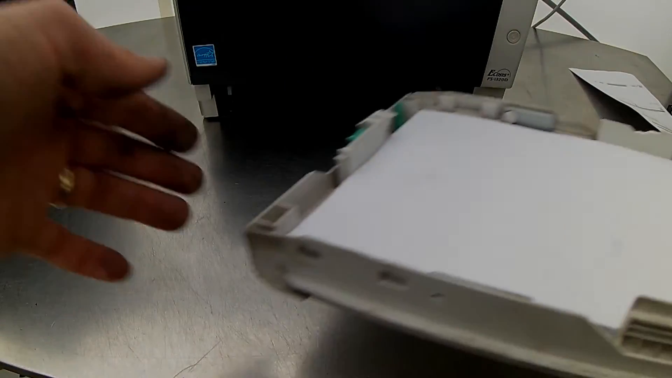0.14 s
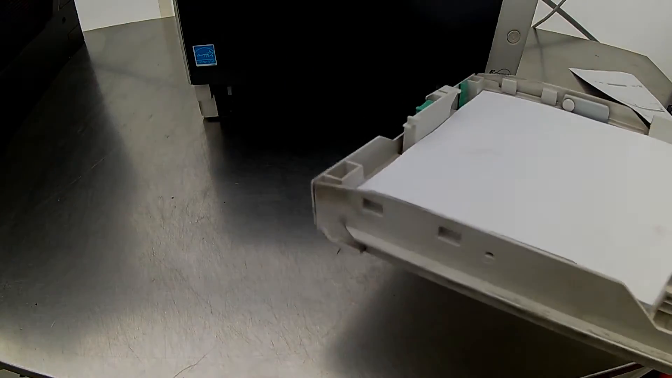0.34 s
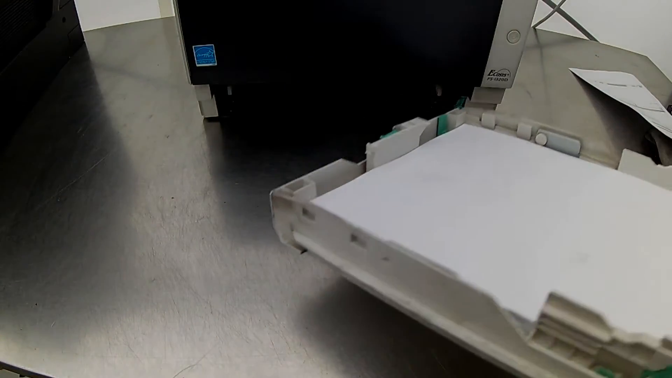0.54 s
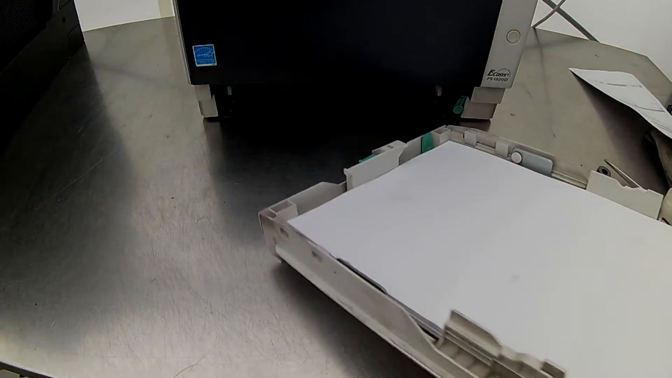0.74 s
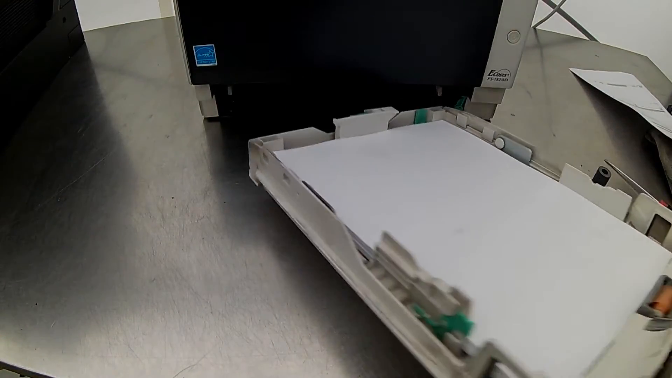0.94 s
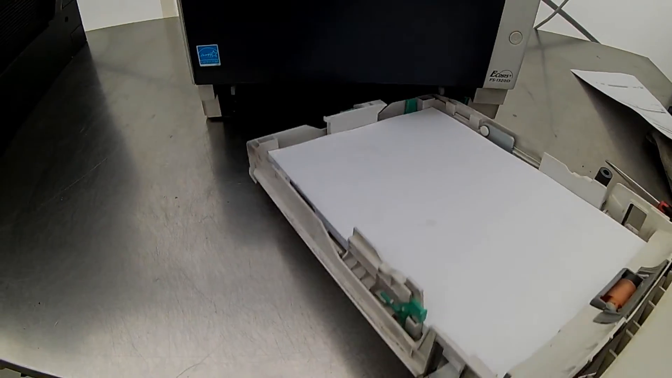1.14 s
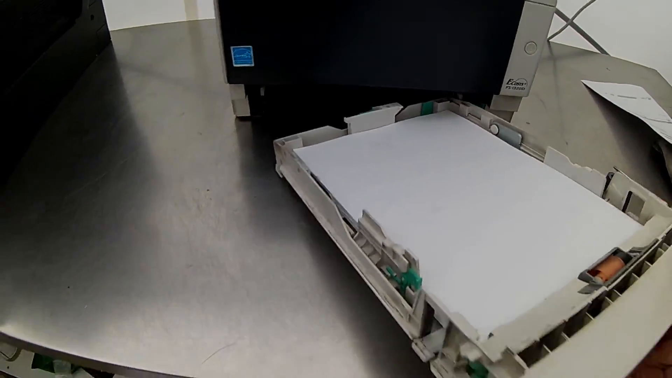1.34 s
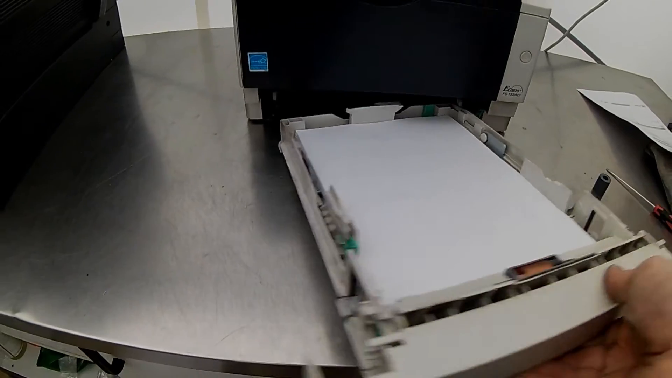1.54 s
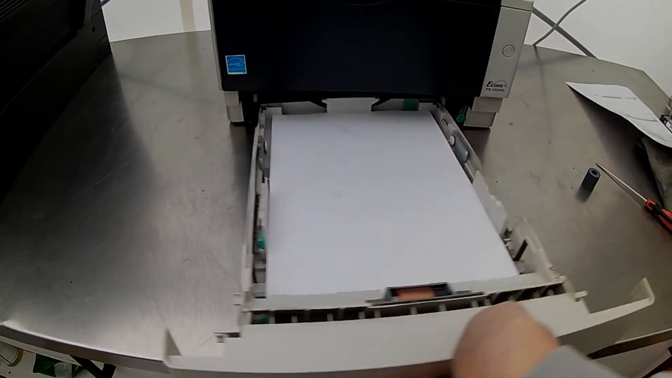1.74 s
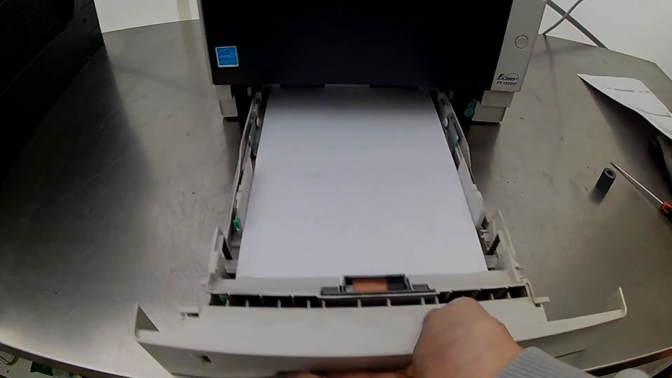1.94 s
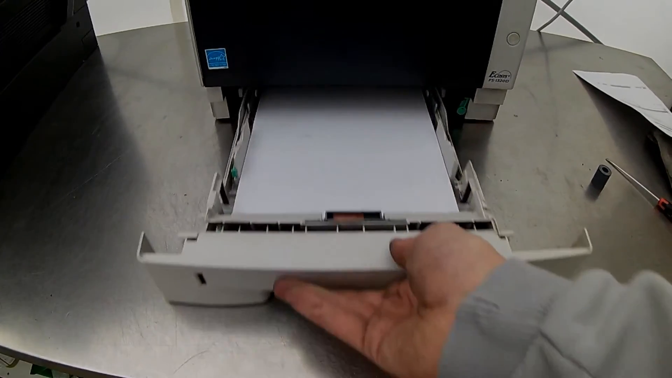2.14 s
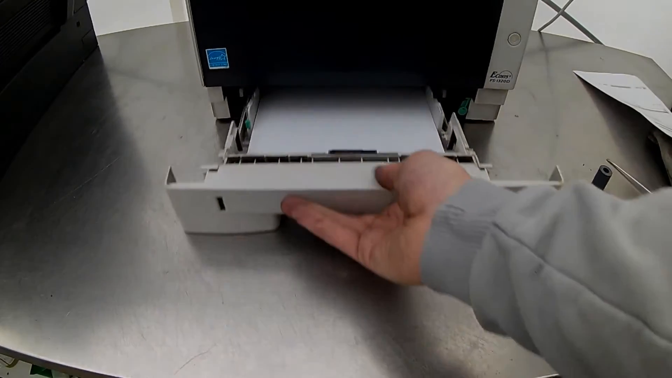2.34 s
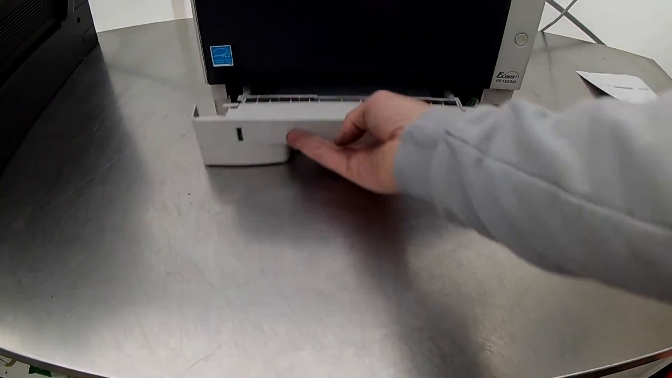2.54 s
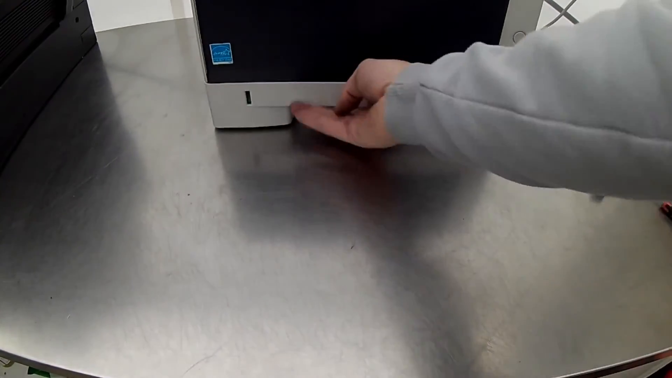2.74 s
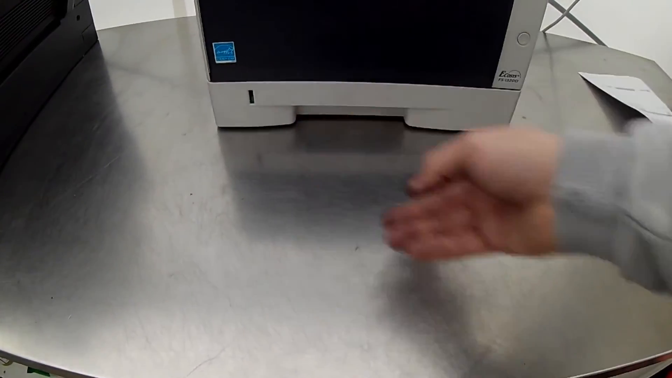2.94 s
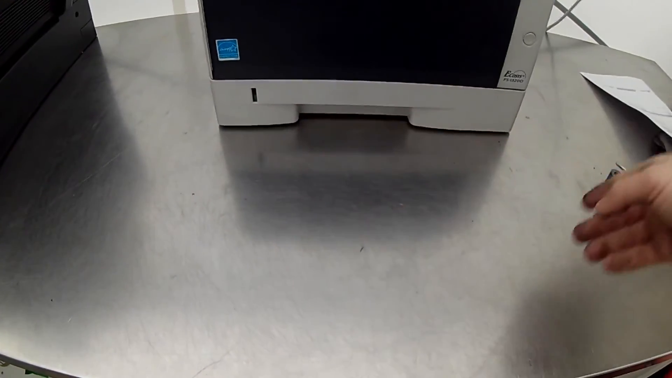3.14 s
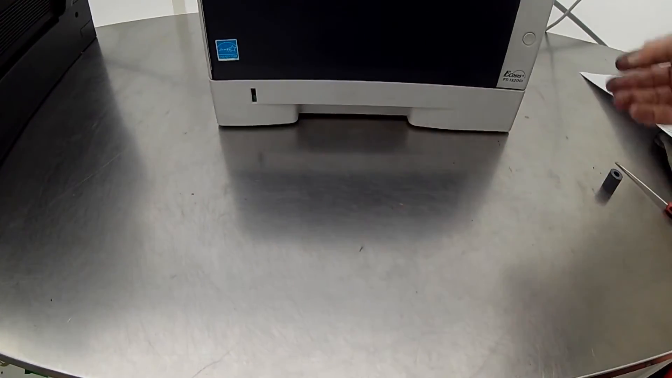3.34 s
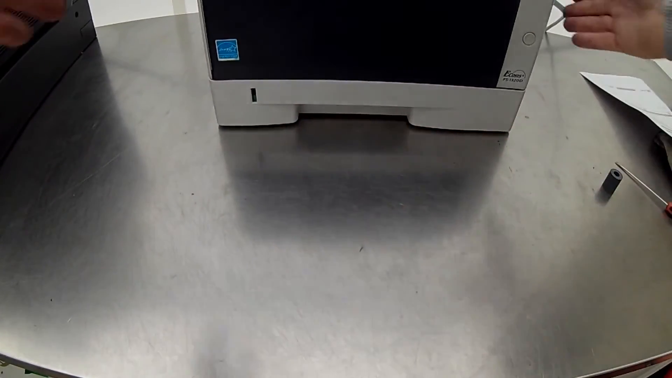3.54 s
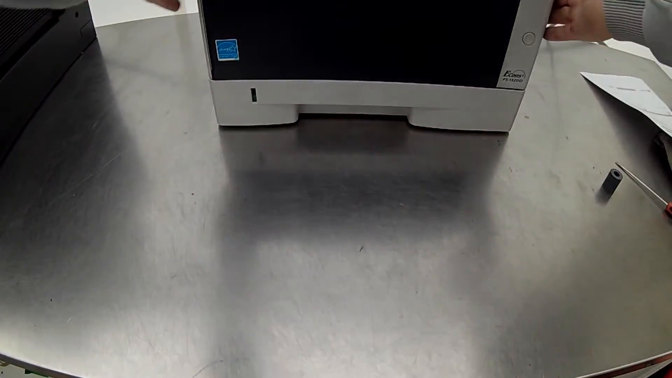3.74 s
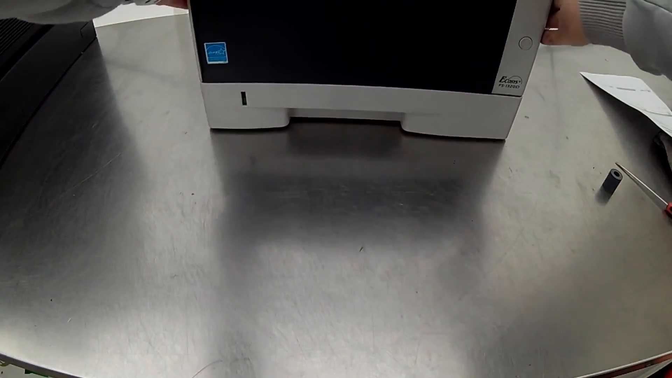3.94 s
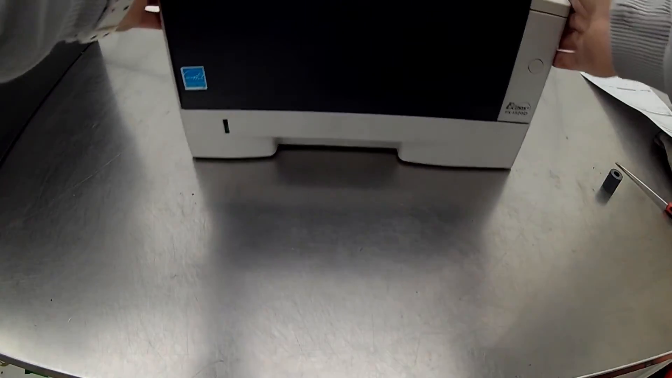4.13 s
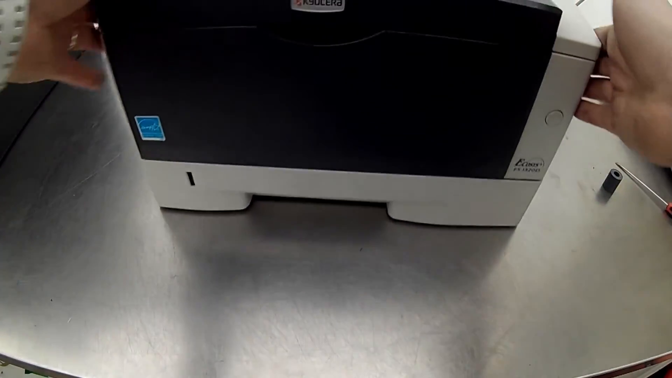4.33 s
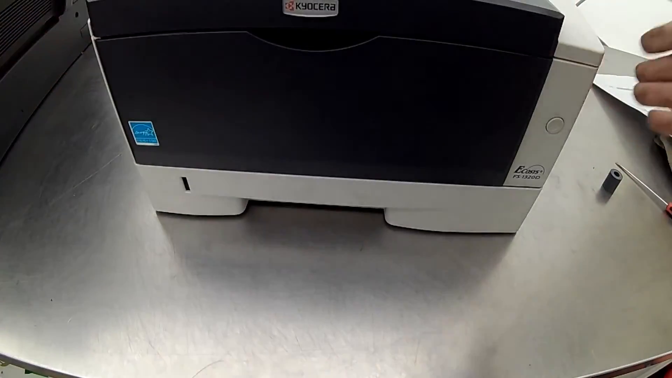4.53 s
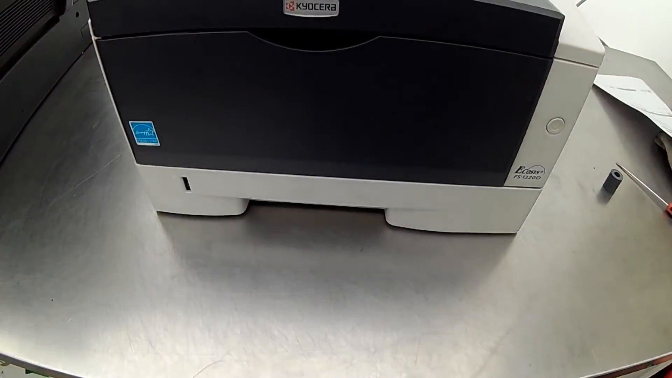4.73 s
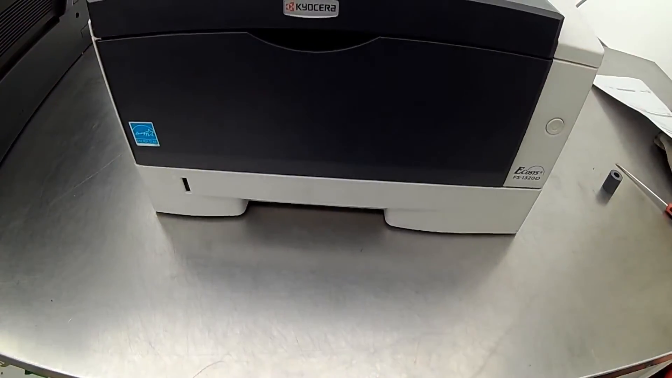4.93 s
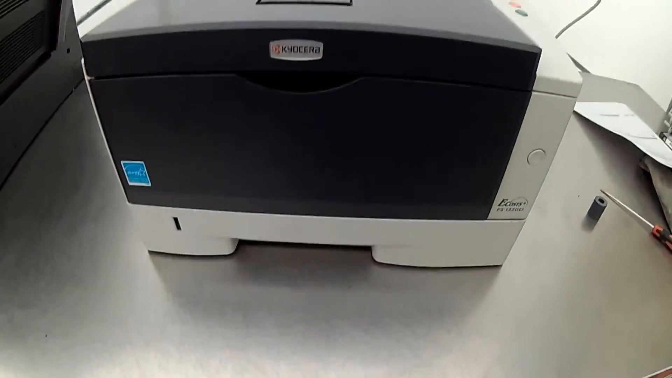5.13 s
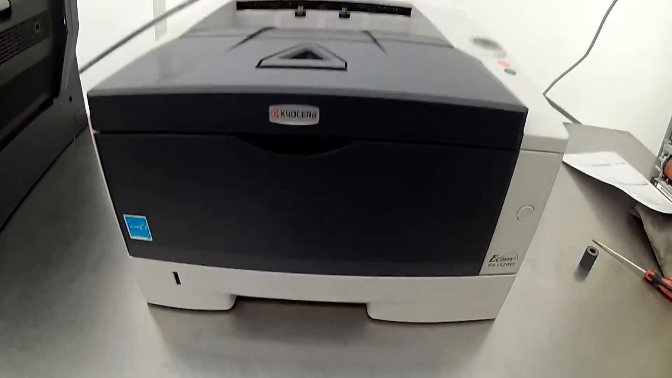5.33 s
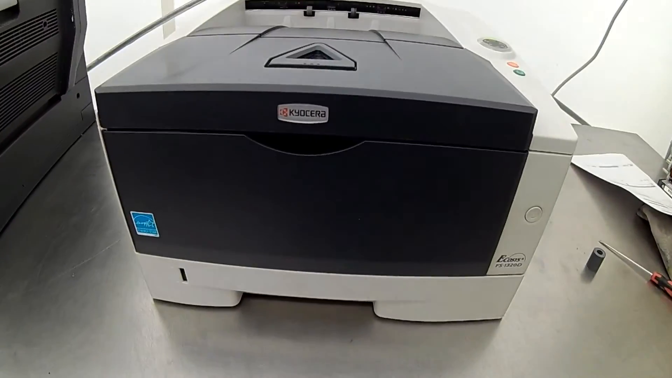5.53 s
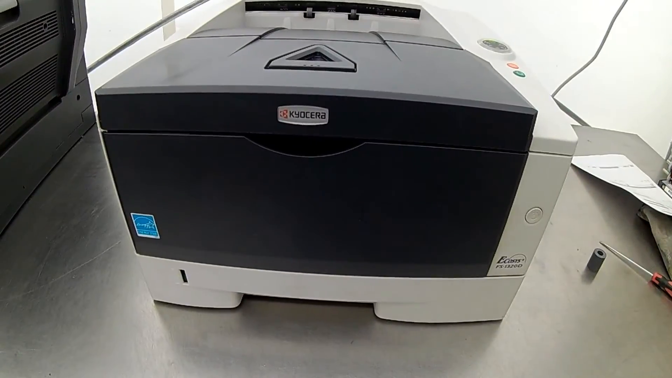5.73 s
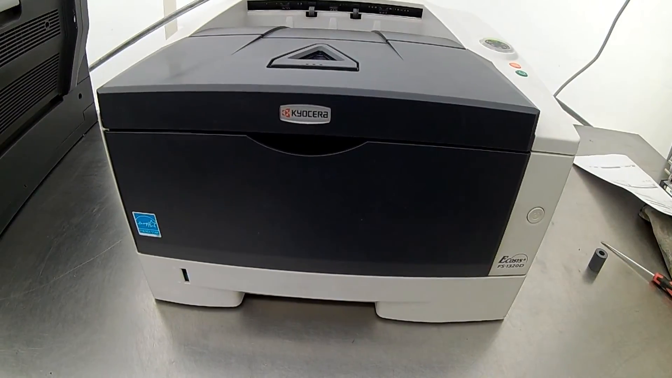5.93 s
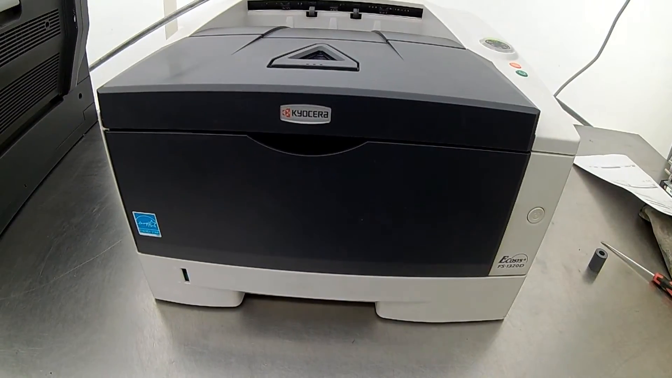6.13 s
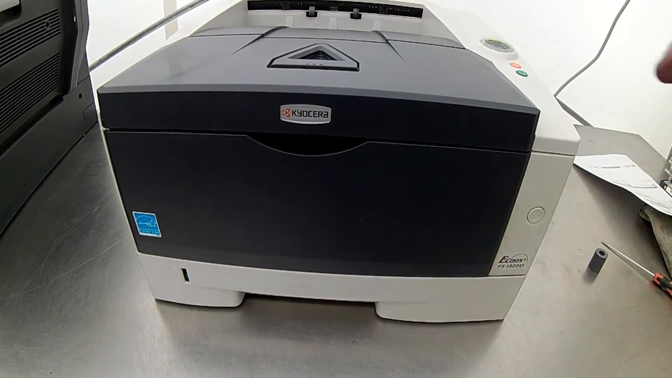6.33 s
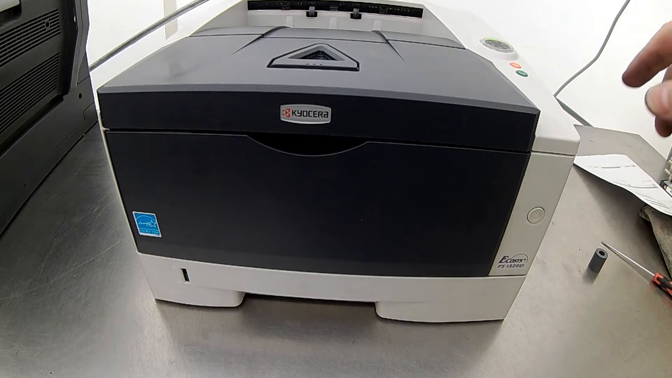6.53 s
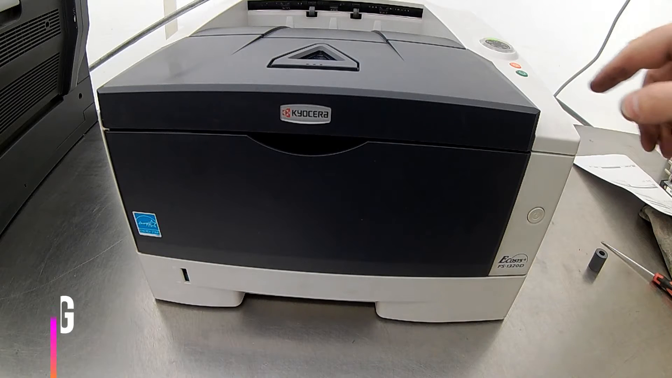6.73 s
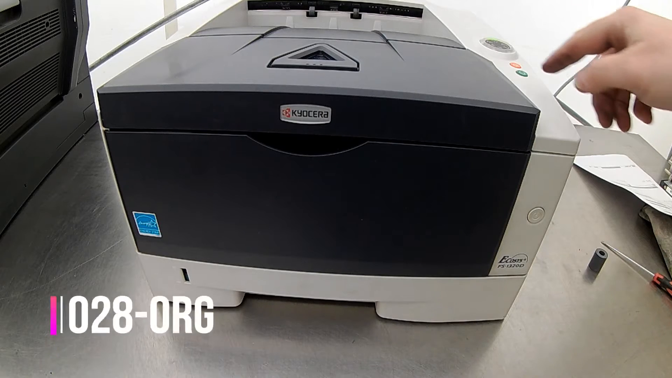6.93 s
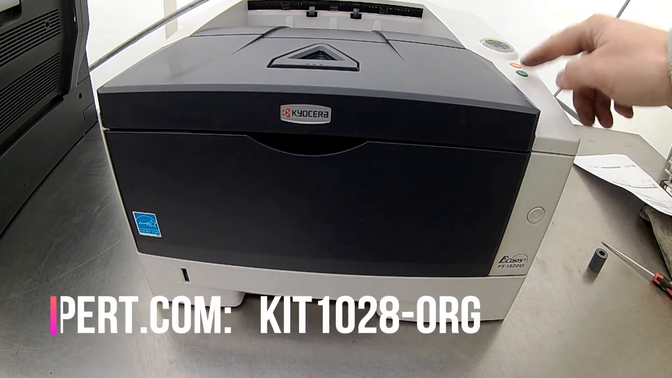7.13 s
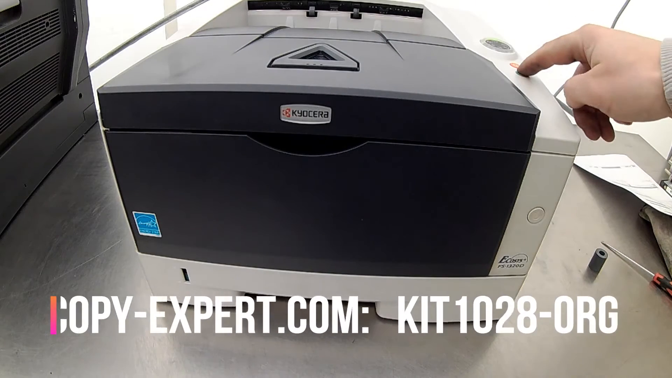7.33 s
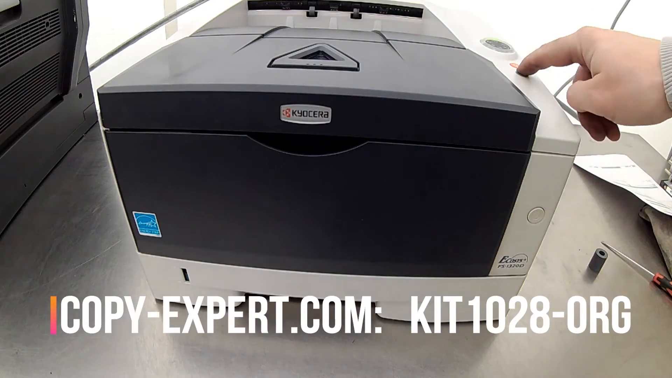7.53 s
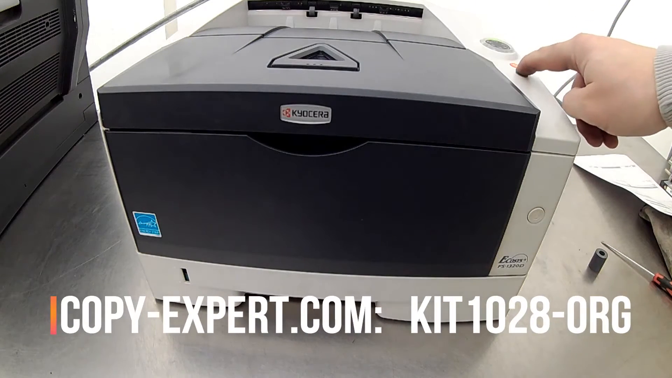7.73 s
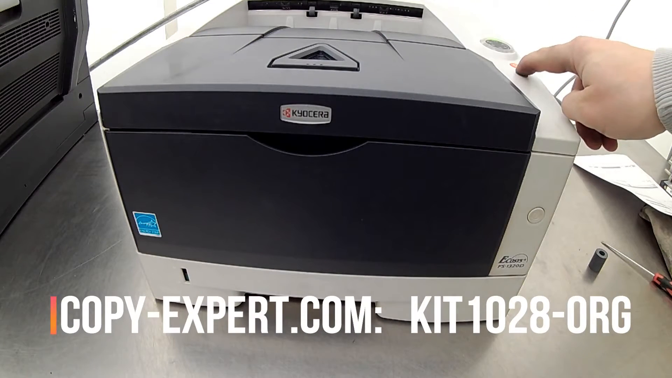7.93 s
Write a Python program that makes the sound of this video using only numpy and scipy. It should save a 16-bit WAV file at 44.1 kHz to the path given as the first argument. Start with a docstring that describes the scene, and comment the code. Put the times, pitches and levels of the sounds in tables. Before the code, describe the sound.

In a small room with faint ventilation, a heavy plastic tray lands on a steel table with a booming clack. It knocks and bumps along runners, scrapes, squeaks briefly and slams home with the loudest clack. The printer is shoved with a few shuddering thumps, then quieter rubbing. A mount near the microphone creaks and clicks softly, almost dry; finally a single small button click.

```python
"""Over room ventilation, a dull rumble of a loaded plastic paper tray's lift fades; the tray lands on a steel table.
It judders into a laser printer on squeaking runners and slides home until it latches; the printer is shoved.
Then a mount close by creaks and clicks, nearly dry, and at the end a finger clicks a button.
Contacts are chatters of tiny impacts or stick-slip friction that ring banks of modes in a small room;
the scrape is a shower of tiny catches, and the air and the table's rumble are shaped noise."""
import sys
import numpy as np
from scipy import signal
from scipy.fft import rfft, irfft, next_fast_len
from scipy.io import wavfile
from scipy.ndimage import uniform_filter1d

SR = 44100
rng = np.random.default_rng(int(sys.argv[2]) if len(sys.argv) > 2 else 0)


def materialize(psi):
    """Save the field psi as 16-bit PCM at rate SR to the path in sys.argv[1].

    A 1-D psi becomes a single channel; in a 2-D psi each row is a channel.
    """
    bounded = np.clip(np.atleast_2d(psi).T, -1, 1)
    quanta = np.round(bounded * 32767).astype(np.int16)
    wavfile.write(sys.argv[1], SR, quanta)


N = 355887
RING_SIZE = SR // 7  # samples in one ring
EDGE_HZ = 12000  # top of the band

# Room ventilation. Each row: frequency in Hz, relative level in dB.
AIR_SPECTRUM = [(15, -37.5), (25, -5.5), (54, -3.5), (156, -9), (212, -5.5), (274, -15), (414, -8),
                (448, -4.5), (484, -9), (1100, -8), (2100, -21.5), (11800, -32.5), (15300, -59),
                (22000, -120)]
AIR_DB = -59
# Dull rumble of the tray's lift, already fading at time zero and gone by the third value:
# two ramp times ahead of time zero in s, end of the fade in s, level at the top of the ramp in dB.
TRAY_LIFT = (-0.25, -0.76, 0.83, -46)
# Tone of the lift, then of the swaying table. Each row: frequency in Hz, relative level in dB.
LIFT_SPECTRUM = [(20, -8.0), (60, 3.0), (110, -1.5), (220, -11.5), (450, -22), (1500, -79)]
SWAY_SPECTRUM = [(20, -20.0), (42, -11), (56, -2.5), (75, -11.5), (130, -26.0), (500, -81)]
# The table sways under the work. Each row: start in s, peak in s, end in s, peak level in dB.
SWAYS = [(0.05, 0.55, 1.05, -65), (1.6, 3.25, 4.27, -56.5), (4.3, 5.097, 6.6, -59)]
SHAKE_DB, SHAKE_S = -27.5, 0.25  # sway after a judder: level against its clack before trim, extra time

# Five ringing parts, boom, hollow body, shell clack, rib snap and fizz. Each row: low edge in Hz,
# high edge in Hz, t60 of the crowded modes in s, their level against the clear modes in dB before crowding.
PARTS = [(62, 200, 0.13, 2), (200.4, 646, 0.16, -4), (534, 1783, 0.026, 4), (1760, 5900, .024, 6.5),
         (5230, 12000, .04, 0)]
# Clear modes of table, tray and shell. Each row: frequency in Hz, relative level in dB, t60 in s.
BODY_MODES = [(81, -10.5, .11), (107.4, -1, 0.08), (146.5, -1.5, .15), (185.4, 0, 0.086),
              (240, -2.5, 0.045), (283, 5, 0.032), (333.32, -4, 0.036), (424, -7.5, .1), (700, -1.5, 0.024),
              (856, -2, 0.044), (954.4, -2.5, .05), (1057, 0.5, 0.045), (1128, -1.5, .06), (1344, 3, 0.034),
              (1450, -4, 0.057), (1792, -11.5, 0.045), (2080, -0.5, .03), (2290, 1, 0.03),
              (2460, -3, 0.027), (3700, 0, .02), (4240, -7, .02)]
# Strength of the crowded modes. Each row: frequency in Hz, relative level in dB.
PLASTIC_SPECTRUM = [(50, -13.5), (120, 0.5), (300, 0.5), (600, 0), (900, 1.5), (1450, -2.5), (1800, -6),
                    (2400, -8), (3100, -14.5), (3900, -9.5), (5000, -22.5), (7000, -31), (12000, -29.5)]

# Tray, printer or guides knock. Each row: start in s, chatter length in s, clack level in dB before trim,
# weight (hollow body over clack) in dB, hardness (rib snap over clack) in dB.
KNOCKS = [(0.062, 0.0033, -59.5, -11, 5), (0.6937, 0.002, -39, -15, 3), (0.7194, 0.0032, -24, -11, -5),
          (0.953, 0.004, -46, -9, -10.5), (1.061, 0.0068, -15, -0.5, -3), (1.099, 0.0037, -12, -7.5, -7),
          (1.238, 0.0043, -37, 6.5, -3), (1.256, 0.0035, -30.5, 18, -10), (1.369, 0.007, -20.5, 11.5, -0.5),
          (1.425, 0.0042, -31, 9, -11), (1.4592, 0.0065, -29.5, 0.5, -10), (1.54, 0.006, -37, 6, -14),
          (1.626, 0.0016, -23.5, -8.5, -5.5), (1.815, 0.008, -44.5, 13, 3), (2.071, 0.0015, -22, 6.5, -9),
          (2.219, 0.0062, -26, -17, -11), (2.595, 0.0041, -21, -16, -13.5),
          (2.604, 0.011, -17.5, -18, -6.5), (2.707, 0.012, -3.5, -13, -13), (3.058, 0.002, -25, 8, -10.5),
          (3.071, 0.0026, -16.5, -3.5, -8.5), (3.093, 0.007, -24, 12.5, -4.5), (3.219, 0.011, -51, 20, -20),
          (3.3225, 0.0026, -49.5, 13.5, -19), (3.84, 0.013, -29.5, -18, -13.5),
          (4.022, 0.006, -39, -20, -15), (4.194, 0.0027, -39.5, -2.5, -12), (4.513, 0.0082, -39, -13, -14)]
# Rustle of paper and guides after a knock: level against its clack before trim, decay time, rise time.
SETTLE_DB, SETTLE_S, SETTLE_RISE_S = -12.5, 0.033, .006

# Hand pushes that slide the tray, then the printer. Each row: start in s, peak pressure in s, end in s,
# scrape level in dB before trim, weight in dB.
PUSHES = [(0.45, 0.865, 2.07, -56.5, 0.5), (0.978, 1.147, 1.8, -50, 11), (1.586, 2.194, 2.7, -41, -6),
          (1.834, 1.966, 2.25, -37.5, 6), (2.54, 2.69, 2.83, -32, -15), (3.05, 3.206, 3.57, -66, 7),
          (3.72, 3.807, 4.34, -52, -14), (3.9, 4.375, 4.62, -50, -8), (4.65, 4.797, 5.07, -59, 7)]
HISS_DB, HISS_PER_WEIGHT = -3.5, 0.27  # hiss against the scrape, and its dB per dB of weight
SWELL_CURVE = 0.76  # how steeply a push swells and eases off: 1 is a straight ramp

# Tray or printer rubs, sticking and slipping. Each row: start in s, length in s, mean slip rate setting
# per s, clack level in dB before colour, fizz level in dB.
RUBS = [(0.644, 0.063, 78.1, -57.5, -59.5), (1.185, 0.13, 167, -46, -81), (1.388, 0.062, 147, -32, -67),
        (1.446, 0.037, 140, -38, -65), (1.488, 0.046, 138, -38, -87), (1.524, 0.019, 160, -35.5, -85),
        (1.61, 0.028, 400, -47, -63), (2.224, 0.0347, 359, -41.5, -53), (2.689, 0.018, 600, -25.5, -43),
        (3.82, 0.034, 530, -37.5, -62)]
# Colour of a rub; rows are hollow body, clack and snap.
# Each row: level in dB at RUB_RATE, change in dB per octave of slip rate.
RUB_COLOUR = [(3.5, -7.5), (-0.5, 0.5), (-4.5, -1.5)]
RUB_RATE = 300  # slips per s

# The tray lands, bumps onto its runners twice, then the printer is shoved. Each row: start in s, end in s,
# gap between bumps in s, heaviest moment in s, its clack level in dB before trim, fade to either side
# in dB per s, weight in dB at the heaviest, hardness in dB, table boom in dB before weight.
JUDDERS = [(1.0454, 1.06, .0104, 1.046, -15, 501, 3.5, -5, -3.5),
           (1.935, 1.972, .0147, 1.951, -15, 447, 4.5, -7, -4.5),
           (2.007, 2.058, .0152, 2.012, -20, 270, 6.5, -10.5, -11),
           (2.9633, 3.23, .038, 3.055, -24, 157, 8.5, -12.5, -3.5)]
JUDDER_CHATTER = .4  # share of each gap spent chattering
JUDDER_DULLING = 0.31  # lighter bumps are duller: dB of weight gained per dB of fade

# The runners squeak. Each row: start in s, length in s, start pitch in Hz, end pitch in Hz, level in dB,
# third harmonic against the fundamental in dB.
SQUEAKS = [(2.383, 0.053, 2582, 2550, -43, -27), (2.492, 0.047, 1090, 1035, -36.5, -15),
           (2.531, 0.035, 1130, 1090, -36, -25)]

# Mount clicks. Each row: start in s, chatter length in s, clack in dB, weight in dB, hardness in dB.
MOUNT_CLICKS = [(4.718, 0.011, -49, 0, -11), (5.1052, 0.00092, -42.5, 9, 6.5),
                (5.139, 0.0021, -48.5, 12, -4), (5.307, 0.00294, -57, 20.5, -8),
                (5.7828, 0.0014, -46, 12.5, -5.5), (5.908, 0.0011, -54, 0, -2),
                (5.954, 0.0017, -43.5, 6.5, -6.5), (5.995, 0.002, -32, 6.5, -8)]
# The mount's joint creaks and rubs. Each row: start in s, length in s, mean slip rate setting per s,
# clack level in dB before colour, fizz level in dB.
MOUNT_CREAKS = [(4.79, 0.12, 222, -49.5, -85), (4.947, 0.019, 280, -54, -85),
                (4.985, 0.045, 185, -54.5, -86), (5.079, 0.097, 330, -51, -58.5),
                (5.276, 0.11, 104, -55, -71), (5.418, 0.044, 570, -57, -70),
                (5.532, 0.051, 860, -56.5, -65), (5.641, 0.06, 900, -52, -58.5)]
# Colour of a creak; rows are hollow body, clack and snap.
# Each row: level in dB at RUB_RATE, change in dB per octave of slip rate.
CREAK_COLOUR = [(7, -7), (1, 1), (1, 1)]
# Clear modes of the mount. Each row: frequency in Hz, relative level in dB, t60 in s.
MOUNT_MODES = [(149, 0, 0.2), (245.7, 2, 0.057), (350, -6.5, 0.07), (744, -5.5, 0.12), (1130, 5, 0.038),
               (2280, 3, 0.011), (3700, -16.5, 0.069)]

# A finger clicks the panel button. Each row: start in s, chatter length in s, clack level in dB before trim,
# weight in dB, hardness in dB.
BUTTON = [(7.167, 0.005, -38, -20, -3.5)]
# Clear modes of the button. Each row: frequency in Hz, relative level in dB, t60 in s.
BUTTON_MODES = [(1010, 12, 0.05), (1274, -14, 0.037), (2340, 1.5, 0.018)]

# Reverberation of the room. Each row: frequency in Hz, t60 in s.
ROOM_T60 = [(100, 0.48), (300, 0.31), (1000, 0.23), (4000, 0.24), (10000, 0.21)]


def amp(db):
    """Decibels to gain."""
    return 10 ** (np.asarray(db) / 20)


def evened(x):
    """Scales to an rms of one."""
    return x / np.sqrt(np.mean(x ** 2) + 1e-20)


def crested(x):
    """Scales so that the loudest 15 ms have an rms of one."""
    power = uniform_filter1d(x ** 2, size=661, mode="constant")
    return x / np.sqrt(power.max() + 1e-20)


def read(points, hz):
    """Reads a table on a logarithmic frequency axis."""
    f, value = np.transpose(points)
    return np.interp(np.log(hz + 1), np.log(f + 1), value)


def add(mix, s, sound):
    """Mixes a sound in at time s, cut off at the end of the mix."""
    place = mix[round(s * SR):][:len(sound)]
    place += sound[:len(place)]


def noise(spectrum):
    """Noise with the given spectrum and an rms of one."""
    size = next_fast_len(N)
    gains = amp(read(spectrum, np.fft.rfftfreq(size, 1 / SR)))
    white = rfft(rng.standard_normal(size))
    return evened(irfft(white * gains, size)[:N])


def swell(start, peak, end, db):
    """A gain for every sample: pressure builds up to a peak and eases off."""
    ramp = np.interp(np.arange(N) / SR, [start, peak, end], [0, 1, 0])
    return amp(db) * ramp ** SWELL_CURVE


def parts(modes, crowding_db=0):
    """Per part of an object: band filter, clear modes as dying phasors, crowded modes, their decay and share."""
    t = np.arange(RING_SIZE) / SR
    crowd = noise(PLASTIC_SPECTRUM)
    made = []
    for lo, hi, t60, crowd_db in PARTS:
        band = signal.butter(3, [lo, hi], "band", fs=SR, output="sos")
        clear = [amp(db - 60 * t / life) * np.exp(2j * np.pi * hz * t)
                 for hz, db, life in modes if lo <= hz < hi]
        clear = np.reshape(clear, (-1, RING_SIZE))  # keeps its shape without any modes
        decay = amp(-60 * t / t60)
        made.append((band, clear, signal.sosfilt(band, crowd), decay, amp(crowd_db + crowding_db)))
    return made


def ring(part, force):
    """A part answers a force within its band; each point of contact weights its modes anew."""
    band, clear, crowd, decay, share = part
    phases = np.exp(2j * np.pi * rng.random(len(clear)))
    weights = rng.uniform(0.64, 1, len(clear)) * phases
    tones = signal.sosfilt(band, (weights @ clear).real)
    start = int(rng.random() * (N - RING_SIZE))
    dense = crowd[start:][:RING_SIZE] * decay
    answer = crested(tones) + share * crested(dense)
    return signal.sosfilt(band, signal.oaconvolve(force, answer))


def contact(body, force, levels_db):
    """The given parts ring under one force, each at its own level."""
    return sum(amp(db) * crested(ring(part, force)) for part, db in zip(body, levels_db))


def chatter(length, gap=.0022, rebound=0.68, count=12):
    """One firm impact, then mostly lighter ones at uneven gaps while the loose parts settle."""
    force = np.zeros(int(length * SR) + 2)
    when, strength, side = rng.random((count, 3))[:int(length / gap) + 1].T
    progress = (np.arange(len(when)) + when) / len(when)
    at = (progress * (len(force) - 1)).astype(int)
    force[at] = rebound * (.5 + strength) * np.sign(side - .5)
    force[0] = 1
    return force


def colour(clack_db, weight_db, hardness_db, boom_db, fizz_db, fizz_slope, boom_slope=0.65):
    """Levels of the five parts under a blow: weight brings out body and boom, hardness snap and fizz."""
    boom = boom_db + boom_slope * weight_db
    fizz = fizz_db + fizz_slope * hardness_db
    return clack_db + np.array([boom, weight_db, 0, hardness_db, fizz])


def blow(body, length, levels_db, contact_hz=4200):
    """A chatter of impacts, rounded off by the give of the plastic, rings the five parts."""
    soften = signal.butter(1, contact_hz, fs=SR, output="sos")
    force = signal.sosfilt(soften, np.pad(chatter(length), (0, 20)))
    return contact(body, force, levels_db)


def ventilation():
    """The room's air is steady noise that thins out towards the treble."""
    return amp(AIR_DB) * noise(AIR_SPECTRUM)


def rumble():
    """Low noise fades after the tray's lift, and swells on the steel table under work and after each judder."""
    lift = noise(LIFT_SPECTRUM) * swell(*TRAY_LIFT)
    shakes = [(start - .01, heaviest, end + SHAKE_S, db + SHAKE_DB)
              for start, end, _, heaviest, db, *_ in JUDDERS]
    return lift + noise(SWAY_SPECTRUM) * sum(swell(*row) for row in SWAYS + shakes)


def knocks(body, rows, send_db, trim_db=-2.5, boom_db=-18, fizz_db=-23.0, fizz_slope=0.7, send_per_weight=0.47):
    """Plastic knocks: the direct sound, and what spreads into the room (more from light, thin parts)."""
    out = np.zeros((2, N))
    for s, length, db, weight_db, hardness_db in rows:
        levels_db = colour(db, weight_db, hardness_db, boom_db, fizz_db, fizz_slope)
        sound = amp(trim_db) * blow(body, length, levels_db)
        add(out[0], s, sound)
        add(out[1], s, amp(send_db - send_per_weight * weight_db) * sound)
    return out


def pressure():
    """Pushes, and settling after knocks, drive hollow body, shell and hiss: three gains for every sample."""
    power = np.zeros((3, N))
    t = np.arange(SR // 3) / SR
    for *push, weight_db in PUSHES:
        balance = amp([weight_db, 0, HISS_DB + HISS_PER_WEIGHT * weight_db])
        power += np.outer(balance, swell(*push)) ** 2
    settling = np.minimum(t / SETTLE_RISE_S, 1) * np.exp(-t / SETTLE_S)
    for s, _, db, weight_db, hardness_db in KNOCKS + BUTTON:
        for part, part_db in zip(power, [min(weight_db, 0), 0, hardness_db]):
            add(part, s, (amp(db + part_db + SETTLE_DB) * settling) ** 2)
    return np.sqrt(power)


def slide(body, drive, grains_per_s=1500, spread_db=1.5, trim_db=-3.0, fizz_db=-12,
          rasp_hz=3850, rasp_db=-3, surge_db=2, count=3):
    """Tiny catches of uneven size, at several points along the runners, ring the plastic under a fine rasp."""
    caught = rng.random(N) < grains_per_s / SR
    size = amp(spread_db * np.minimum(rng.exponential(1, N), 4))
    force = caught * rng.choice([-1, 1], N) * size
    point = rng.integers(count, size=N)
    hollow, shell, ribs = (evened(sum(ring(part, force * (point == k))[:N] for k in range(count)))
                           for part in body[1:-1])
    grit = force * rng.standard_normal(N) + rng.standard_normal(N) * force.std()
    rasp_band = signal.butter(2, [rasp_hz / 1.3, rasp_hz * 1.17], "band", fs=SR, output="sos")
    rasp = evened(signal.sosfilt(rasp_band, grit))
    fizz = evened(signal.sosfilt(body[-1][0], grit))
    hiss = evened(ribs + amp(rasp_db) * rasp) + amp(fizz_db) * fizz
    # the hand's pressure surges unevenly
    surge = uniform_filter1d(uniform_filter1d(rng.standard_normal(N), size=900), size=600)
    return amp(trim_db + surge_db * evened(surge)) * (drive * (hollow, shell, hiss)).sum(axis=0)


def rattles(body, drive, over_db=-1, spread_db=3, count=36):
    """Loose guides and flaps tick at random, following how strongly the plastic is being driven."""
    out = np.zeros(N)
    first, last = PUSHES[0][0], PUSHES[-1][2]
    when, strength = rng.random((count, 2)).T
    times = first + (np.arange(count) + when) / count * (last - first)
    for s, lift_db in zip(times, over_db + spread_db * (2 * strength - 1)):
        drive_db = 20 * np.log10(drive[:, int(s * SR)] + 1e-9)
        add(out, s, contact(body[1:-1], np.ones(1), lift_db + drive_db))
    return out


def slips(length, rate, jitter=0.18, grit=0.041):
    """Plastic sticks and lets go at a nearly even rate, over fine grit; the pressure swells and fades."""
    size = min(int(length * SR), RING_SIZE)
    force, unevenness = rng.standard_normal((2, RING_SIZE))
    force = grit * force[:size]
    strength = rng.uniform(0.66, 1, RING_SIZE)
    at = (np.cumsum(np.exp(jitter * unevenness)) * SR / rate).astype(int)
    at = at[at < size]
    force[at] += strength[:len(at)]
    return force * signal.windows.tukey(size, .5)


def rubs(body, rows, rub_colour, release_hz):
    """Stick-slip friction shakes all parts but the boom; a slower release makes each slip duller."""
    out = np.zeros(N)
    soften = signal.butter(2, release_hz, fs=SR, output="sos")
    usual_db, per_octave_db = np.transpose(rub_colour)
    for s, length, rate, db, fizz_db in rows:
        levels_db = db + usual_db + per_octave_db * np.log2(rate / RUB_RATE)
        force = signal.sosfilt(soften, slips(length, rate))
        add(out, s, contact(body[1:], force, [*levels_db, fizz_db]))
    return out


def judders(body, trim_db=-3.0, fizz_db=-22, fizz_slope=0.63, boom_slope=1.0):
    """The load bumps at an even pace and booms the table, hardest at one moment and fading to either side."""
    out = np.zeros(N)
    for start, end, gap, heaviest, db, fade, weight_db, hardness_db, boom_db in JUDDERS:
        for s in np.arange(start, end, gap):
            drop_db = fade * abs(s - heaviest)
            dulled_db = weight_db + JUDDER_DULLING * drop_db
            levels_db = colour(db - drop_db, dulled_db, hardness_db, boom_db, fizz_db, fizz_slope, boom_slope)
            add(out, s, amp(trim_db) * blow(body, JUDDER_CHATTER * gap, levels_db))
    return out


def squeaks(waver=0.018):
    """Short, slightly unsteady friction tones from the runners."""
    out = np.zeros(N)
    for s, length, start_hz, end_hz, db, third_db in SQUEAKS:
        size = int(length * SR)
        wander = evened(uniform_filter1d(rng.standard_normal(size), size=100))
        hz = np.linspace(start_hz, end_hz, size) * (1 + waver * wander)
        turn = 2 * np.pi * np.cumsum(hz) / SR
        tone = np.sin(turn) + amp(third_db) * np.sin(3 * turn)
        add(out, s, amp(db) * crested(tone * np.hanning(size)))
    return out


def mount(crowding_db=-8, release_hz=6000, boom_db=-5, fizz_db=-22, fizz_slope=1.7):
    """A mount close by clicks by chatter and creaks by stick-slip, on modes of its own."""
    body = parts(MOUNT_MODES, crowding_db)
    out = rubs(body, MOUNT_CREAKS, CREAK_COLOUR, release_hz)
    for s, length, *blow_db in MOUNT_CLICKS:
        levels_db = colour(*blow_db, boom_db, fizz_db, fizz_slope)
        add(out, s, contact(body, chatter(length), levels_db))
    return out


def button(crowding_db=4.0):
    """A finger's click rings the button's few modes: direct sound and room send."""
    return knocks(parts(BUTTON_MODES, crowding_db), BUTTON, send_db=-16.5)


def room(x, first=0.0044, build=0.0074):
    """Sparse reflections build up after a short gap and die band by band."""
    t = np.arange(SR // 2) / SR
    sparse = rng.random(len(t)) < 4000 / SR
    taps = rng.choice([-1., 1.], len(t)) * sparse * np.clip((t - first) / build, 0, 1)
    hz, when, z = signal.stft(taps, SR, nperseg=256)
    decay = amp(-60 * when / read(ROOM_T60, hz)[:, None])
    tail = signal.istft(z * decay, SR, nperseg=256)[1]
    return signal.fftconvolve(x, tail / np.linalg.norm(tail))[:N]


def scene(judder_send_db=-14, friction_send_db=-12, mount_send_db=-19, tray_release_hz=2400):
    """Knocks and friction in the room, over its ventilation and the table's rumble."""
    body, drive = parts(BODY_MODES), pressure()
    near, spread = knocks(body, KNOCKS, send_db=-13) + button()
    friction = slide(body, drive) + rattles(body, drive)
    friction += rubs(body, RUBS, RUB_COLOUR, tray_release_hz) + squeaks()
    bumps = judders(body)
    creaking = mount()
    send = spread + amp(judder_send_db) * bumps + amp(friction_send_db) * friction
    echo = room(send + amp(mount_send_db) * creaking)
    return (ventilation() + rumble() + near + friction + bumps + creaking + echo)[None]


def record(dry, knee=0.74):
    """Peaks above the knee are rounded off towards full scale; then the treble is cut at the band's top."""
    over = np.maximum(abs(dry) - knee, 0)
    rounded = (1 - knee) * np.tanh(over / (1 - knee))
    held = np.sign(dry) * (abs(dry) - over + rounded)
    lowpass = signal.firwin(511, EDGE_HZ, window=("kaiser", 9), fs=SR)
    return signal.oaconvolve(held, lowpass[None], "same")


dry = scene()
out = record(dry)
materialize(out)
```